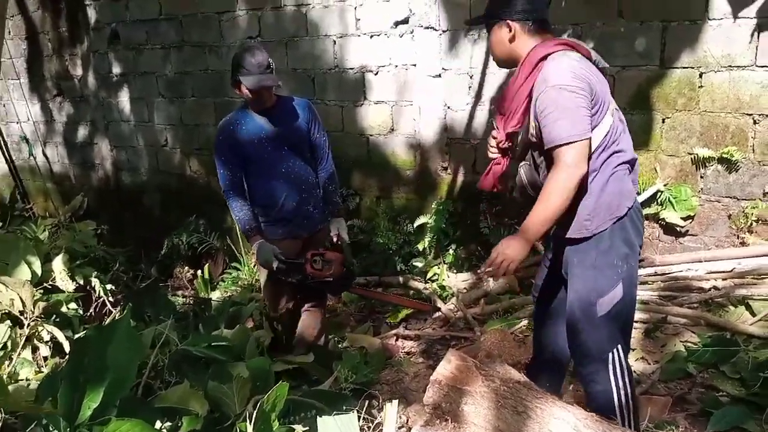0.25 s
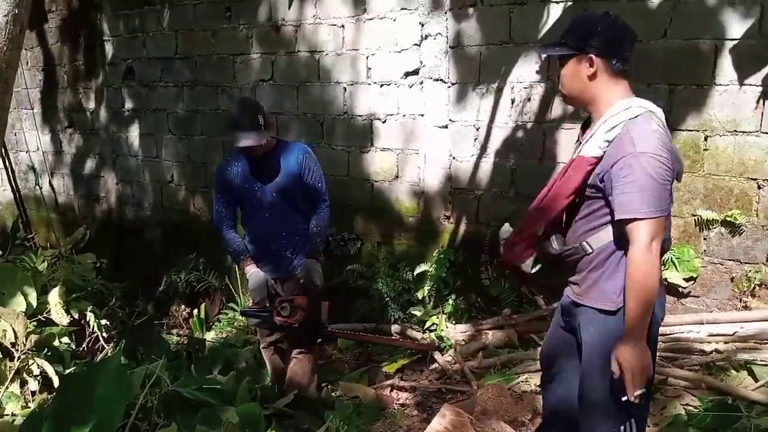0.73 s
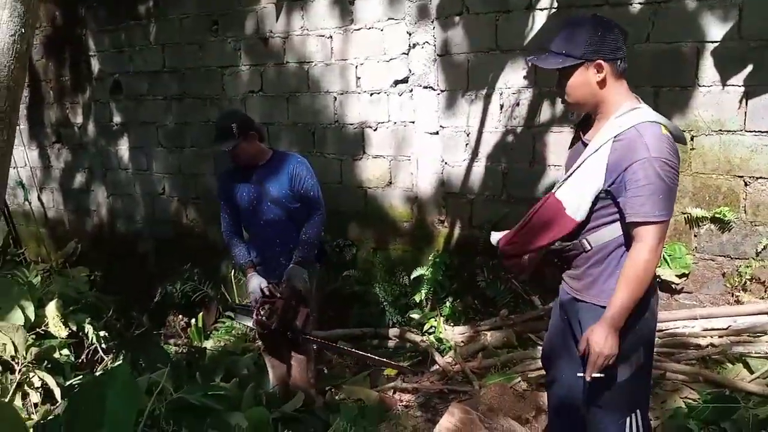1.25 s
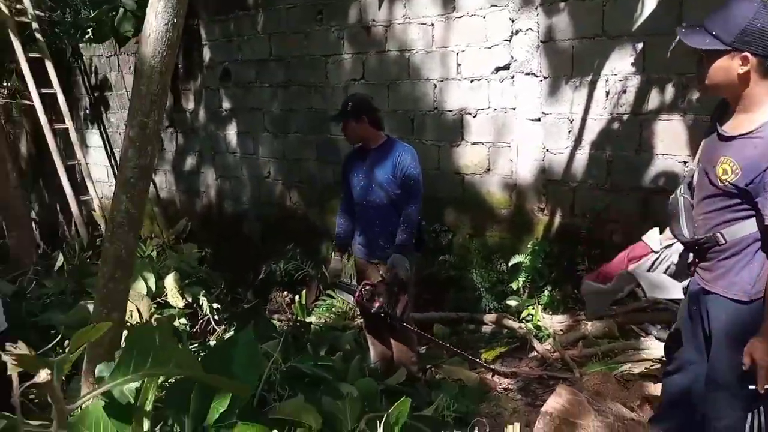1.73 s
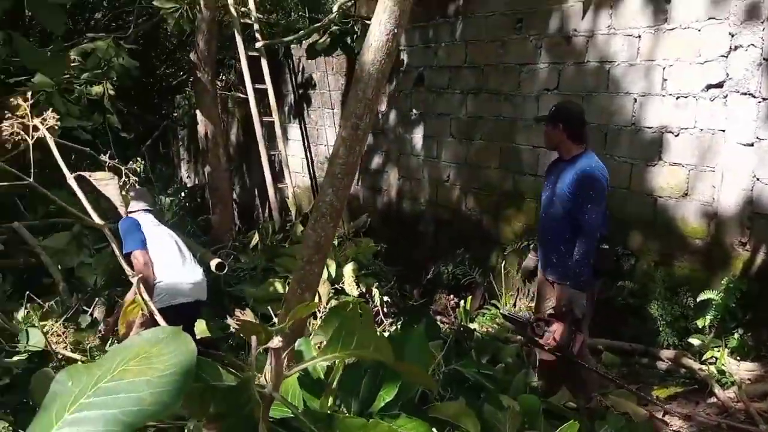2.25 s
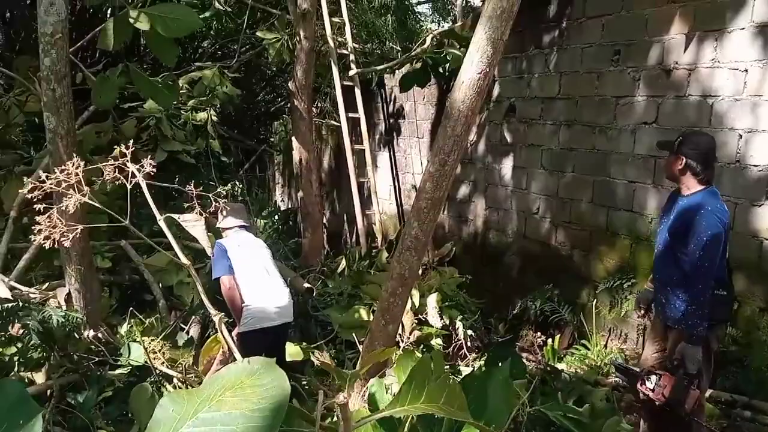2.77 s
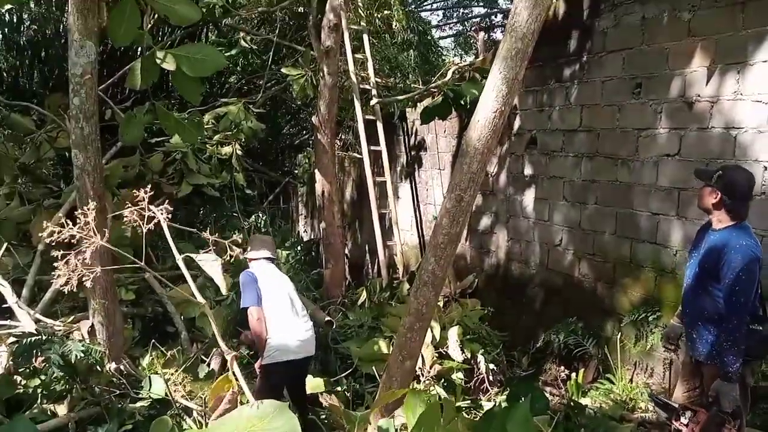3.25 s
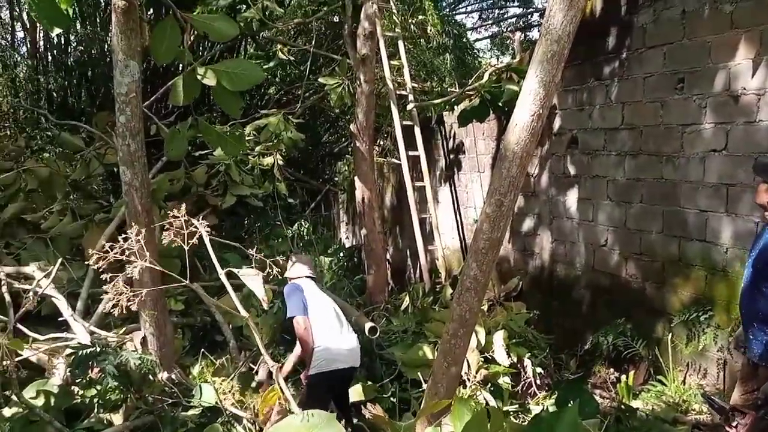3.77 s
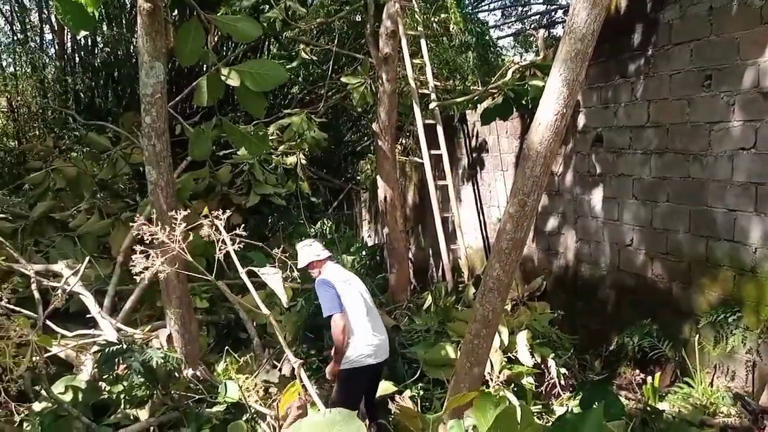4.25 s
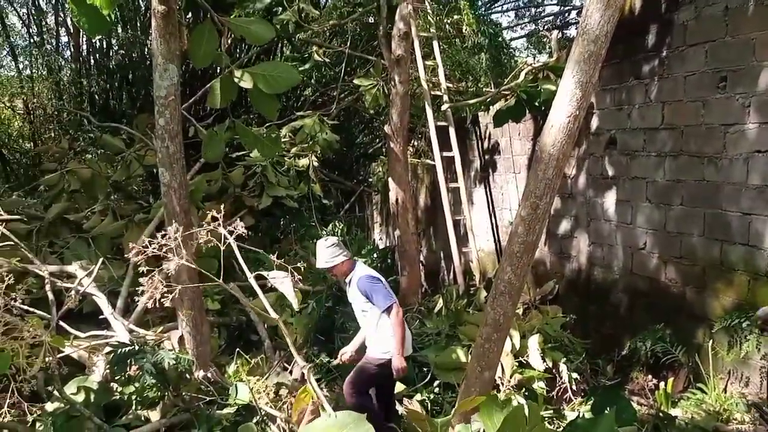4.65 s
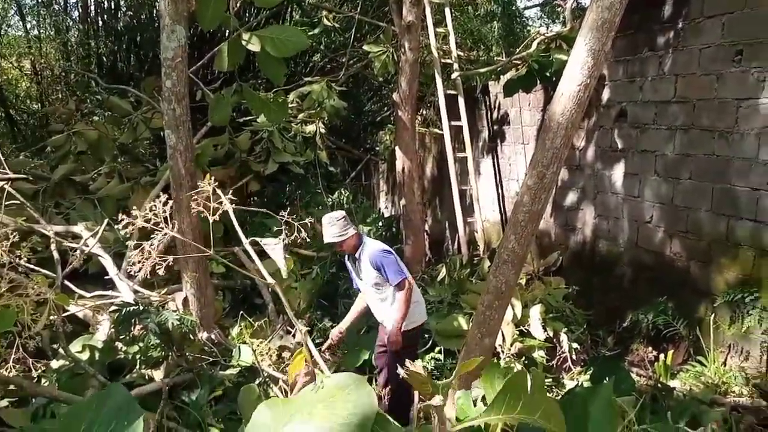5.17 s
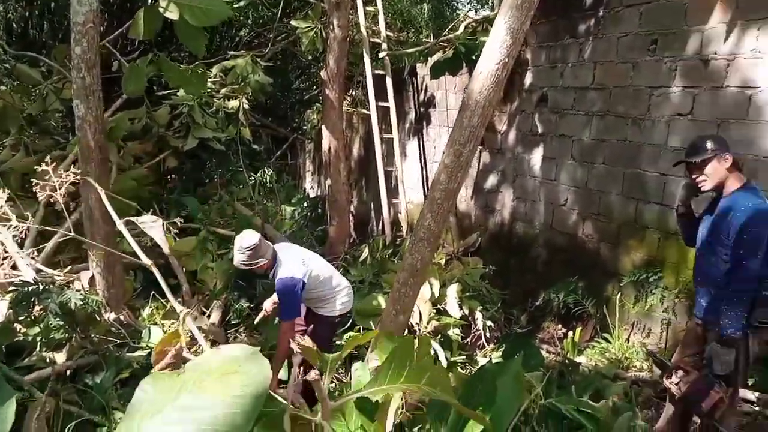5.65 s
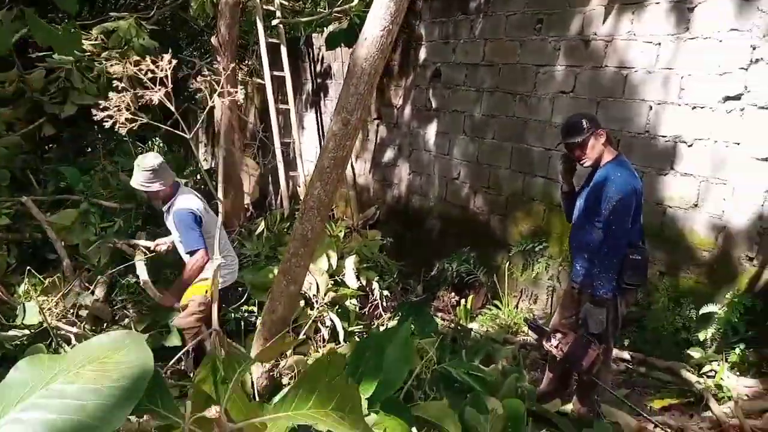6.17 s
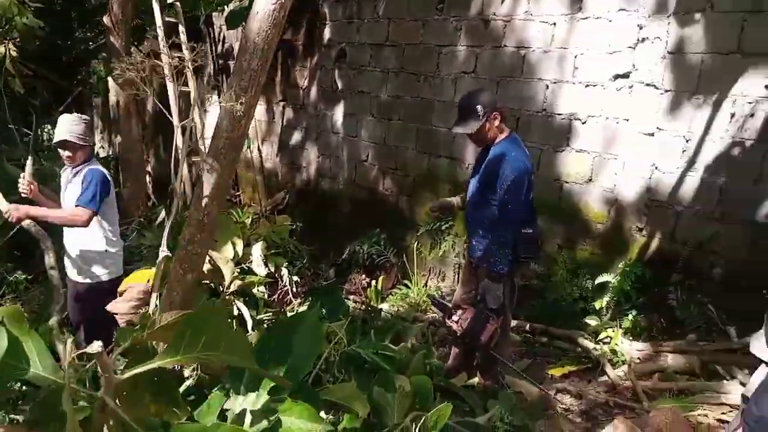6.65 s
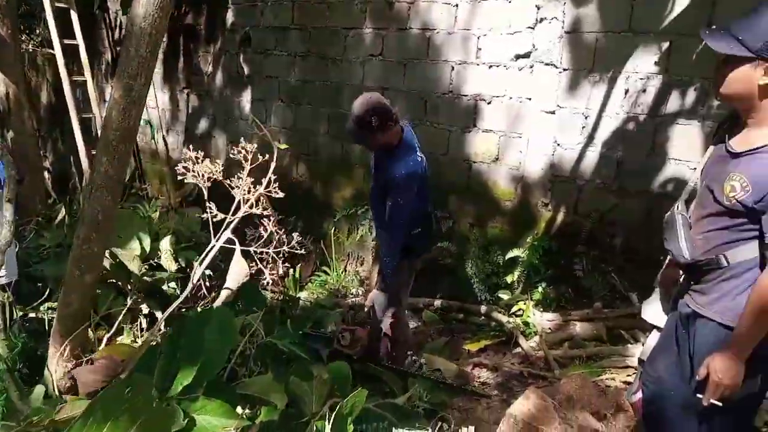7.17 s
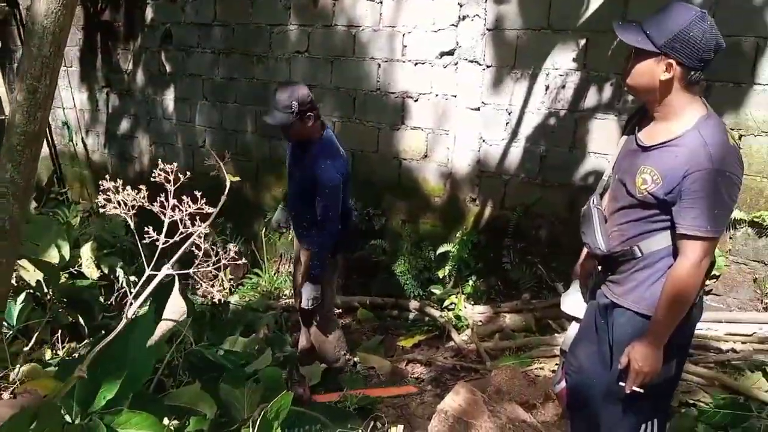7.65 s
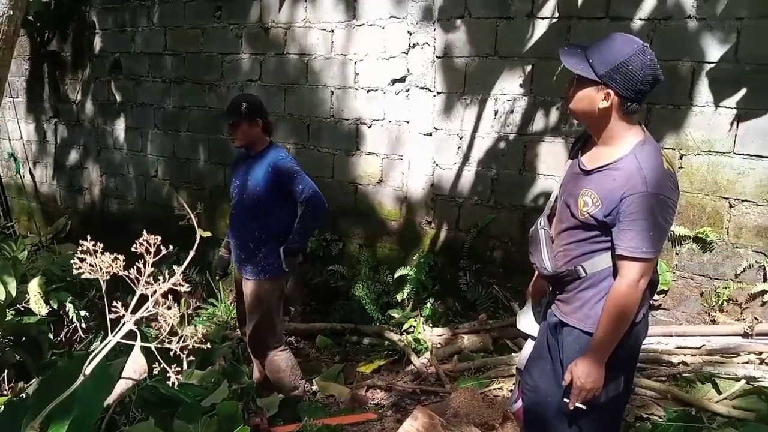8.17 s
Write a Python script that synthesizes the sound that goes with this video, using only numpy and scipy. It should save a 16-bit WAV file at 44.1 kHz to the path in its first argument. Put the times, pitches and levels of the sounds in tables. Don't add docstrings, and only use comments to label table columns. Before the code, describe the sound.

A two-stroke saw engine misfires along at high revs, loses its spark and coasts down through slowing pops and airy gulps. A dry plastic click follows. Then come irregular leafy chops, knocks, snapping twigs and rustling drags, with short hollow pole scrapes early and a faint far bird whistle. The shrill cicada rises once the engine is gone. Close outdoor yard sound, short wall echoes, mono.

```python
import sys
import numpy as np
from scipy import signal
from scipy.fft import rfft, irfft, next_fast_len
from scipy.io import wavfile
from scipy.ndimage import uniform_filter1d, map_coordinates

SR = 44100
rng = np.random.default_rng(int(sys.argv[2]) if len(sys.argv) > 2 else 0)


def level_to_linear(level):
    exponent = np.asarray(level, float) / 20
    return 10 ** exponent


def to_wav(s):
    ch = np.atleast_2d(s).T
    pcm = np.round(np.clip(ch, -1, 1) * 32767)
    wavfile.write(sys.argv[1], SR, pcm.astype(np.int16))


N = 370919

# time in seconds, speed in turns a second.
CRANK_SPEED = [
    (0, 74.2),
    (.24, 71.6),
    (.38, 74.3),
    (.55, 73.4),
    (.98, 73.4),
    (1.08, 68.3),
    (1.32, 40.7),
    (1.5, 19.1),
    (1.7, 9.2),
]
# first firing in seconds, firings, turns apart.
FIRING_RUNS = [(.011, 3, 2), (.107, 9, 2), (.368, 4, 2), (.489, 7, 2), (.665, 2, 1), (.707, 2, 2),
               (.748, 2, 2), (.816, 4, 2), (.911, 3, 1), (.967, 2, 2), (1.007, 1, 1)]
# time in seconds, peak in dB.
HARD_BURNS = [(0.0104, -11.5), (0.1062, -14), (0.2444, -28), (0.2718, -12.5), (0.2994, -38), (0.3272, -13),
              (0.4204, -26), (0.4484, -12.5), (0.8425, -14.5), (0.9384, -39.5), (0.9667, -11)]
# speed in turns a second, then pop, thump, crack, clatter, gulp and
# second pop, all in dB.
TURN_BY_SPEED = [(9, -17.5, -20, -30, -52.5, -30, -16), (17.7, -10.5, -18, -29, -42.5, -12.5, -7.5),
                 (27.3, -18, -7.5, -27.5, -44, -21.5, 2.5), (42.3, -9, -13.5, -36.5, -31.5, -22.5, -6.5),
                 (72.4, -12, -30, -36, -31, -10, 1.5), (72, -11.5, -32, -73, -33.5, -16, -4.5)]
# pop, thump and crack, in dB.
FIRING_SCATTER = (.8, 2.5, 2.5)
# pitch in Hz, width in Hz, level in dB.
MUFFLER_RINGS = [(310.5, 38, -6), (402, 64, 4.5), (458, 72, 3.5), (603, 47, -8), (782, 103, 3),
                 (858, 51, -2.5), (944, 41, -10.5), (1110, 60, -20)]
# pitch in Hz, width in Hz, level in dB.
CASE_RINGS = [(160, 143, 24), (204, 20, -5.5)]
# pitch in Hz, width in Hz, level in dB.
TAILPIPE_BARK = [(900, 620, 0)]
# frequency in Hz, level in dB per Hz.
CLATTER_TONE = [(900, -10), (1300, -9), (1800, -5.5), (2240, -2.5), (2600, -16), (2900, -31), (3150, -2),
                (3420, -4.5), (3900, -11.5), (4600, -8), (6860, -44), (9000, -23.5), (13000, -73),
                (15500, -25.5)]
# frequency in Hz, level in dB per Hz.
BLAST_TONE = [(500, -13.5), (1500, 3), (2500, -8.5), (4500, 0), (7500, -6.5), (10000, -18.5), (15500, -31)]
# time in seconds, level in dB.
CHAIN_LEVEL = [
    (0, -33.5),
    (.12, -34),
    (.21, -35),
    (.26, -56),
    (.4, -92),
]
# its level in dB, then rows of pitch in Hz, width in Hz, level in dB.
SET_DOWN_KNOCK = (-8.5, [(380, 80, 9), (800, 470, 0.5), (3650, 3000, -14.5)])
# delay in seconds, level in dB.
ECHOES = [
    (0.011, -7),
    (.019, -31.5),
]
# frequency in Hz, time to fall 60 dB in seconds.
YARD_DECAY = [(100, 0.063), (1000, 0.12), (8000, 0.11)]
# time in seconds, peak in dB, knock in dB, twigs in dB, shaking time
# (to fall 60 dB) in seconds.
CHOPS = [(1.4727, -14, -21.5, -28.5, 0.93), (1.81, -26.5, -10.5, 6, 0.097), (1.872, -27, -1.5, 0, 0.28),
         (2.045, -23, -37, -20, 0.99), (2.1116, -17.5, -37, -14, 0.13), (2.3113, -9.5, -15, -4.5, 0.64),
         (2.5968, -37, 9.5, -6.5, 1), (2.6577, -32, -6, 0, 0.31), (3.0569, -8, -24, -7.5, 0.57),
         (3.8169, -6.5, -19, -8.5, 0.57), (3.844, -20, -31, -3, 1), (4.6604, -36, -27, -2.5, 0.25),
         (5.1025, -13.5, -29, -9, 0.79), (5.2163, -27, -11, -16, 0.06), (5.9869, -20.5, -3, 3, 0.41),
         (6.524, -19, -18, -2.5, 0.27), (6.9717, -22, -14, -6.5, 0.3), (7.3901, -9.5, -17, -8, 0.8),
         (8.0808, -12.5, -13.5, -2, 0.55), (8.2316, -36, 2.5, -63, 0.28), (8.2796, -11.5, -10.5, -1, 0.99)]
# pitch in Hz, width in Hz, level in dB.
WOOD_RINGS = [(109, 73, -3.5), (163, 48, 0.5), (311, 127, -6.5)]
# middle in seconds, half length in seconds, dry leaves in dB, twigs in dB
BRANCH_DRAGS = [(0.61, 1, -39.5, -4), (1.565, 0.31, -43.5, -1.5), (1.91, 0.024, -57, 8),
                (2.097, .2, -59, 7.5), (2.652, 0.14, -42.5, -2.5), (2.88, 0.11, -50.5, -5.5),
                (3.097, 0.098, -44.5, -6), (4.02, 0.12, -51.5, 4.5), (4.31, 0.4, -50, -12),
                (4.871, 0.062, -51, 2), (4.988, 0.089, -49, -11.5), (5.173, 0.054, -34, -10),
                (5.337, 0.13, -43, -5.5), (5.707, 0.26, -45, -7), (6.003, 0.086, -36, -5.7),
                (6.18, 0.081, -40.5, 0.8), (6.39, 0.13, -33.5, -4.5), (6.883, 0.4, -40, -2.6),
                (7.295, 0.13, -46.5, -1.5), (7.59, 0.16, -40.5, -5), (7.995, 0.58, -47.5, -5),
                (8.41, 0.094, -38, -14)]
# frequency in Hz, level in dB per Hz.
LEAF_TONE = [(2200, -24), (3300, -4.5), (4200, -3), (6500, 2.5), (7500, -4), (9500, -16), (12200, -27),
             (14300, -18), (15600, -17)]
# frequency in Hz, level in dB per Hz.
TWIG_TONE = [(330, -20.5), (520, -8.5), (800, 0.5), (1500, -1.5), (2800, 1), (3800, -12.5), (6000, -27)]
# frequency in Hz, level in dB per Hz.
RUMBLE_TONE = [(20, -57), (45, -22), (70, 3.5), (135, -8), (330, -3), (420, -10.5), (520, -63)]
# time in seconds, peak in dB, pitch in Hz.
TWIG_CRACKS = [(2.01, -30, 1400), (2.284, -28, 2460), (2.619, -18, 1320), (3.385, -28, 2660),
               (3.512, -44, 4540), (3.58, -28, 4340), (3.64, -34, 1860), (3.7, -32, 4500),
               (4.2, -23.5, 2200), (4.28, -24, 2500), (4.47, -31, 4970), (4.79, -27, 2000),
               (4.82, -34, 800), (4.66, -27, 1300), (5.104, -5, 5140), (5.105, -17, 800),
               (5.761, -19.5, 1200), (6.2, -27, 509), (6.528, -18.5, 420), (6.86, -22, 1940),
               (7.38, -13, 5300), (8.233, -21, 219)]
# pitch in Hz, width in Hz, level in dB.
POLE_RINGS = [(581, 66, -3.5), (757, 74, 0), (1380, 80, -6.5)]
# middle in seconds, half length in seconds, level in dB.
POLE_SCRAPES = [
    (1.921, 0.053, -40.5),
    (2.638, 0.059, -40),
    (2.796, 0.05, -44.5),
    (3.0, 0.069, -45),
    (3.26, .06, -61),
]
# time in seconds, level in dB, treble lift in dB as it faces us.
CICADA_LEVEL = [(0, -54, -9), (1.03, -48, -7), (1.64, -57, 10), (1.96, -55.5, 8), (2.26, -38, -9),
                (2.55, -42.5, -2), (2.8, -41.5, 3), (3.05, -46.5, 7), (3.22, -37.5, -3), (3.75, -40, 0),
                (4.45, -43.5, 6), (5.0, -38, -2), (5.88, -40.5, 2), (6.0, -51.5, 11), (6.6, -45, -3.5),
                (7.22, -48.5, -0.5), (7.45, -42, -5.5), (8.41, -53, 6)]
PHRASE_STARTS = [-1.38, .12, 1.665, 3.115, 4.632, 6.095, 7.565, 9.04]
# share of the phrase, pitch in Hz.
PHRASE_PITCH = [(0, 13692), (.39, 13812), (1, 13614)]
SONG_LINES = [(1, 0), (2, 0), (4, 0), (1, 1), (1, 2), (2, -3), (2, -2), (2, -1), (2, 1), (2, 2), (3, -2),
              (3, -1), (3, 0), (3, 1), (3, 2), (4, -3), (4, -2), (4, -1), (4, 1), (4, 2), (4, 3), (4, 4)]
LINE_LEVELS = [-1, -4, -1, -14.5, -27, -26, -16.5, -13, -19.5, -23, -30, -44, -27.5, -30, -38, -27, -36,
               -18, -16, -21, -24, -34]
# time in seconds, pitch in Hz, level in dB.
WHISTLE = [
    (3.33, 3050, -80),
    (3.37, 3020, -52),
    (3.46, 2800, -52),
    (3.54, 2450, -54),
    (3.6, 2250, -60),
    (3.63, 2200, -90),
]

FIRST_TURN = .83
STOP_S = 1.7
TYMBAL = 323 / 3430


def unit(x):
    return x / np.sqrt(np.mean(x ** 2) + 1e-20)


def curves(rows):
    s, *cols = np.transpose(rows)
    return [np.interp(np.arange(N) / SR, s, c) for c in cols]


def along(points, hz):
    f, v = np.transpose(points)
    return np.interp(np.log(hz + 1), np.log(f), v)


def wobble(rate):
    steps = np.arange(0, N + 32, 32)
    knots = rng.standard_normal(int(N * rate / SR) + 4)
    return np.interp(np.arange(N), steps, map_coordinates(knots, [steps * rate / SR]))


def resonate(x, modes, order=1):
    m = next_fast_len(N + SR // 2)
    f = np.fft.rfftfreq(m, 1 / SR)
    h = 0
    for k, (center, width, db) in enumerate(modes):
        damping = 1j * f * width
        h = h + (-1) ** k * level_to_linear(db) * damping / (center * center - f * f + damping)
    h = h ** order
    return irfft(rfft(x, m) * h, m)[:N] / np.abs(irfft(h, m)).max()


def noise(spectrum, patchy_db, crackle_db):
    grains = level_to_linear(crackle_db * np.repeat(rng.exponential(1, N // 32 + 40), 32))
    hz, _, z = signal.stft(grains * rng.standard_normal(len(grains)), SR, nperseg=512)
    field = uniform_filter1d(rng.standard_normal(z.shape), size=6, axis=0)
    field = uniform_filter1d(field, size=10, axis=1)
    gain = level_to_linear(patchy_db * unit(field) + along(spectrum, hz)[:, None])
    return unit(signal.istft(z * gain, SR, nperseg=512)[1][:N])


def dying(pulses, t60):
    return signal.lfilter([1], [1, -level_to_linear(-60 / (t60 * SR))], pulses)


def swells(mid, half):
    return np.exp(-((np.arange(N) / SR - mid) / half) ** 2)


def crank():
    speed = curves(CRANK_SPEED)[0]
    turns = np.cumsum(speed) / SR - FIRST_TURN
    at = np.flatnonzero((np.diff(np.floor(turns)) > 0) & (np.arange(N - 1) < STOP_S * SR))
    at = at + (5 * (speed[at] > 70) * rng.standard_normal(len(at))).astype(int)
    return speed, turns, at


def port_pulses(speed, at, pop_db, thump_db, crack_db, second_db):
    running = speed[at] > 70
    pops, barks, thumps, cracks = np.zeros((4, N))
    pops[at] = level_to_linear(pop_db[at] + np.where(running, 2, .6) * rng.standard_normal(len(at)))
    thumps[at], cracks[at] = level_to_linear(thump_db[at]), level_to_linear(crack_db[at])
    scatter_db = FIRING_SCATTER * rng.standard_normal((len(at), 3))
    for s, count, apart in FIRING_RUNS:
        k = np.argmin(np.abs(at - s * SR)) + apart * np.arange(count)
        quick_db = -6 * (apart < 2)
        levels_db = [-11.5, -19.5 + quick_db, -29.5]
        pops[at[k]], thumps[at[k]], cracks[at[k]] = level_to_linear(levels_db + scatter_db[k]).T
        barks[at[k]] = level_to_linear(-8.5 - 7 * np.exp(-at[k] / SR / .2))
    for s, db in HARD_BURNS:
        cracks[at[np.argmin(np.abs(at - s * SR))]] = level_to_linear(db - 6)
    delay_s = np.minimum(np.where(running, .45, .5) / speed[at], .0115)
    jitter = np.where(running, 9, 2) * rng.standard_normal(len(at))
    later = at + (delay_s * SR + jitter).astype(int)
    pops[later] = pops[at] * level_to_linear(second_db[at])
    return pops, barks, thumps, cracks


def exhaust(speed, pops, barks, thumps):
    opening = np.hanning(26) / 12
    rasp = level_to_linear(-37) * dying(pops, .06) * rng.standard_normal(N)
    soft = np.convolve(pops + rasp, opening)[:N]
    sharp = np.convolve(barks, opening)[:N]
    heat = np.clip(.5 + .4 * wobble(25), 0, 1) * np.clip(speed / 70, .3, 1)
    hot = [(hz * 1.035, width, db) for hz, width, db in MUFFLER_RINGS]
    cool = [(hz * (1 - .035), width, db) for hz, width, db in MUFFLER_RINGS]
    can = resonate(heat * soft, hot) + resonate((1 - heat) * soft, cool)
    bark = resonate(0.45 * soft + sharp, TAILPIPE_BARK, order=3)
    return bark + level_to_linear(-1.0) * can + level_to_linear(-3.5) * resonate(thumps, CASE_RINGS, order=2)


def gulps(speed, at, gulp_db):
    starts = np.zeros(N)
    starts[at] = at
    last = np.maximum.accumulate(starts).astype(int)
    cycles = (np.arange(N) - last) / SR * np.maximum(6.08 * speed[last], 150)
    return level_to_linear(gulp_db[last]) * np.sin(2 * np.pi * cycles) * np.exp(-cycles / 1.9)


def moving_parts(turns, clatter_db):
    t = np.arange(N) / SR
    rattle_db = 10 * np.exp(-t / .12)
    level_db = clatter_db + rattle_db - 400 * np.maximum(t - STOP_S, 0)
    beat = 1 + 0.41 * np.cos(4 * np.pi * turns - 1.3)
    clatter = level_to_linear(level_db) * noise(CLATTER_TONE, patchy_db=1.5, crackle_db=.6)
    ring = unit(resonate(rng.standard_normal(N), [(4320, 71, 0)]))
    return beat * (clatter + level_to_linear(curves(CHAIN_LEVEL)[0]) * ring)


def engine():
    speed, turns, at = crank()
    rate, *laws = np.transpose(TURN_BY_SPEED)
    levels = [np.interp(speed, rate, law) for law in laws]
    pop_db, thump_db, crack_db, clatter_db, gulp_db, second_db = levels
    pops, barks, thumps, cracks = port_pulses(speed, at, pop_db, thump_db, crack_db, second_db)
    body = exhaust(speed, pops, barks, thumps) + gulps(speed, at, gulp_db)
    low_cut = signal.butter(4, 105, "high", fs=SR, output="sos")
    blast = dying(cracks, .06) * noise(BLAST_TONE, patchy_db=3, crackle_db=.7)
    return signal.sosfilt(low_cut, body) + blast + moving_parts(turns, clatter_db)


def yard(x):
    hz, t, z = signal.stft(rng.standard_normal(SR // 3), SR, nperseg=256)
    tail = signal.istft(z * level_to_linear(-60 * t / along(YARD_DECAY, hz)[:, None]), SR, nperseg=256)[1]
    answer = np.pad(level_to_linear(-13) * tail / np.linalg.norm(tail), (150, 900))
    for delay, db in ECHOES:
        answer[round(delay * SR)] += level_to_linear(db)
    return x + signal.fftconvolve(x, answer)[:N]


def set_down_knock():
    db, modes = SET_DOWN_KNOCK
    return resonate(level_to_linear(db) * (np.arange(N) == round(1.8715 * SR)), modes)


def blows():
    t = np.arange(SR) / SR
    leaves, twigs, knocks = np.zeros((3, N + SR))
    for s, db, knock_db, mid_db, t60 in CHOPS:
        i = round(s * SR)
        shake = level_to_linear(-60 * t / 0.052) + 0.71 * level_to_linear(-60 * t / t60)
        shake *= 1 - np.exp(-t / 0.00087)
        leaves[i:][:SR] += level_to_linear(db - 12.5) * shake
        twigs[i:][:SR] += level_to_linear(db + mid_db - 12.0) * shake
        knocks[i:][:SR] += level_to_linear(db + knock_db - 22.5) * shake * rng.standard_normal(SR)
        knocks[i] += level_to_linear(db + knock_db + 2.5)
    return leaves[:N], twigs[:N], knocks[:N]


def brush():
    mid, half, drag_db, twig_db = np.transpose(BRANCH_DRAGS)[..., None]
    swell = level_to_linear(drag_db) * swells(mid, half)
    stirred, scraped = swell.sum(0), (level_to_linear(twig_db) * swell).sum(0)
    leaves, twigs, knocks = blows()
    gust = wobble(7.0)
    leaf_level = np.hypot((stirred + level_to_linear(-53.5)) * level_to_linear(1.5 + 1.3 * gust), leaves)
    twig_level = np.hypot((scraped + level_to_linear(-65)) * level_to_linear(2 + 1.3 * gust), twigs)
    rumble_level = (level_to_linear(-8.5) * scraped + level_to_linear(-52)) * level_to_linear(3.3 * wobble(17.0))
    dry_leaves = leaf_level * noise(LEAF_TONE, patchy_db=2.5, crackle_db=1.5)
    woody = twig_level * noise(TWIG_TONE, patchy_db=3, crackle_db=2)
    far = rumble_level * noise(RUMBLE_TONE, patchy_db=1.5, crackle_db=2.35)
    return dry_leaves + woody + far + resonate(knocks, WOOD_RINGS)


def twig_cracks():
    out, t = np.zeros(N + SR), np.arange(2600) / SR
    for s, db, hz in TWIG_CRACKS:
        drift = hz / 3000 * np.cumsum(.35 * rng.standard_normal(len(t)))
        ragged = np.sin(2 * np.pi * hz * t + drift)
        fade_db = -60 * t / (.014 + 9 / hz)
        out[round(s * SR):][:len(t)] += level_to_linear(db - 7 + fade_db) * ragged
    return out[:N]


def pole():
    mid, half, db = np.transpose(POLE_SCRAPES)[..., None]
    stroke = (level_to_linear(db) * swells(mid, half)).sum(0)
    slips = level_to_linear(3.0 * wobble(70)) * rng.standard_normal(N)
    return stroke * unit(resonate(slips, POLE_RINGS))


def cicada():
    level_db, lift_db = curves(CICADA_LEVEL)
    first_db = level_db + 1.2 * wobble(8.4)
    second_db = level_db - 2.5 + lift_db + 1.2 * wobble(11)
    fourth_db = level_db + lift_db
    partial_db = [first_db, second_db, fourth_db, fourth_db]
    t = np.arange(N) / SR
    done = np.interp(t, PHRASE_STARTS, np.arange(len(PHRASE_STARTS))) % 1
    hz = uniform_filter1d(np.interp(done, *np.transpose(PHRASE_PITCH)), size=300)
    note = 2 * np.pi * np.cumsum(hz / 4 + .6 * wobble(30)) / SR
    song = np.zeros(N)
    for (k, m), db in zip(SONG_LINES, LINE_LEVELS):
        flicker_db = (.08 * k * k + .4 * abs(m)) * wobble(30)
        fading = 1 + .4 * k / 4 * wobble(22)
        line = np.sin((k + m * TYMBAL) * note + 2 * np.pi * rng.random())
        song += level_to_linear(partial_db[k - 1] + db + 6.5 + flicker_db) * fading * line
    hiss = unit(resonate(rng.standard_normal(N), [(14000, 2000, 0)], order=2))
    haze = level_to_linear(fourth_db - 14) * hiss
    catch = np.exp(-((t - np.transpose([PHRASE_STARTS])) / .0061) ** 4).sum(0)
    return (song + haze) * (1 - .9 * catch)


def ducking(depth_db):
    kicks = np.zeros(N)
    for s, db, *_ in CHOPS:
        kicks[round(s * SR)] = level_to_linear(db + 15.0)
    return level_to_linear(-depth_db * np.minimum(dying(kicks, 0.08), 1))


def bird():
    hz, db = curves(WHISTLE)
    trees = level_to_linear(-60 * np.arange(SR) / SR / .55) * rng.standard_normal(SR)
    call = level_to_linear(db + 4 * wobble(200)) * np.sin(2 * np.pi * np.cumsum(hz) / SR)
    return signal.fftconvolve(call, trees / np.linalg.norm(trees))[:N]


def scene():
    work = yard(engine()) + set_down_knock() + brush() + twig_cracks() + pole()
    mono = work + ducking(depth_db=27) * cicada() + bird()
    return np.array([mono, mono])


def low_pass(x):
    return signal.sosfilt(signal.butter(12, 15890, fs=SR, output="sos"), x)


def record(dry):
    soft = dry / (1 + np.abs(dry / .62) ** 5) ** (1 / 5)
    m = next_fast_len(N)
    hz = np.fft.rfftfreq(m, 1 / SR)
    response = (hz < 15750) / (1 + (55 / (hz + 1)) ** 4)
    mix = irfft(rfft(soft, m) * response, m)[:, :N]
    return low_pass(mix)


dry = scene()
out = record(dry)
to_wav(out)
```